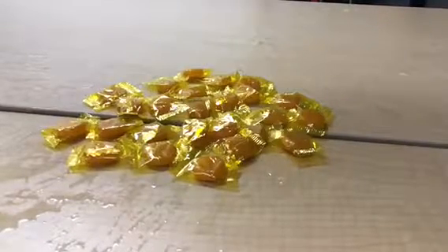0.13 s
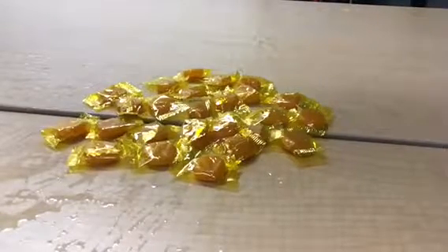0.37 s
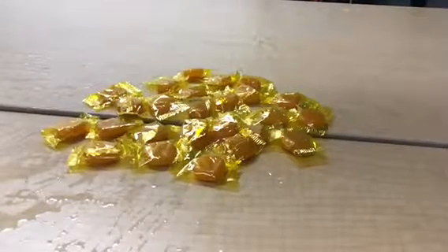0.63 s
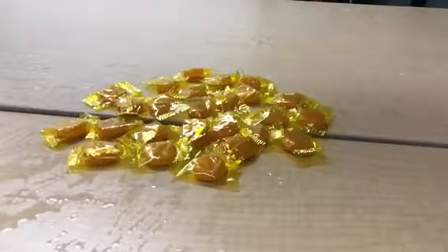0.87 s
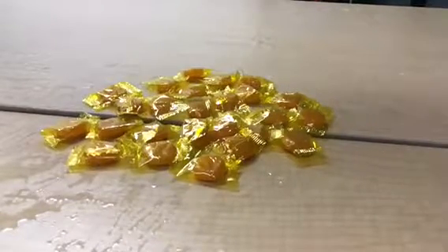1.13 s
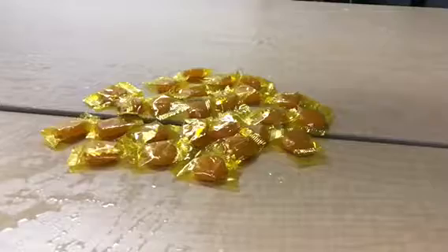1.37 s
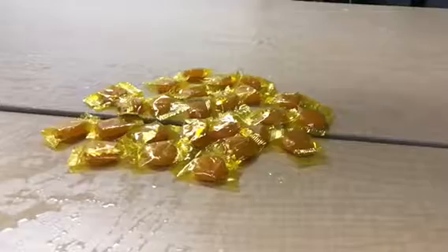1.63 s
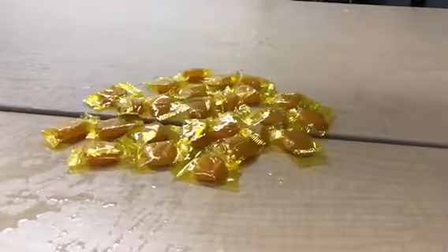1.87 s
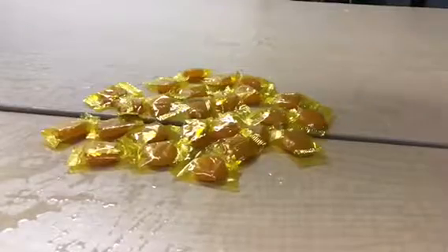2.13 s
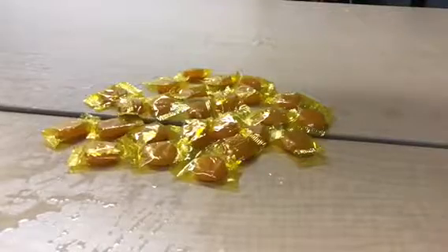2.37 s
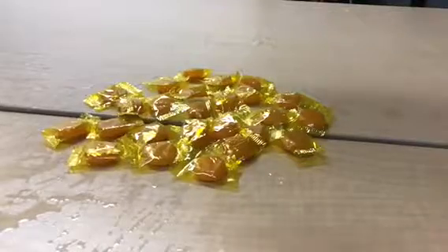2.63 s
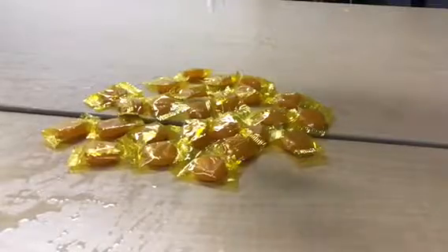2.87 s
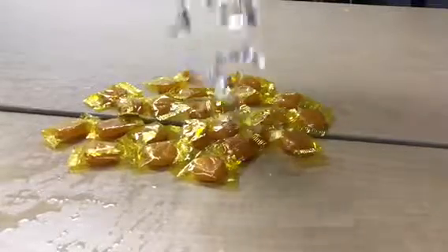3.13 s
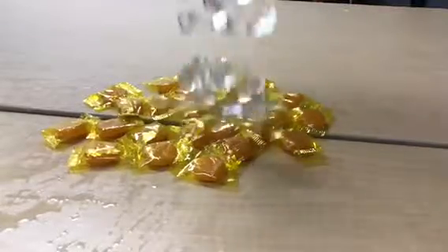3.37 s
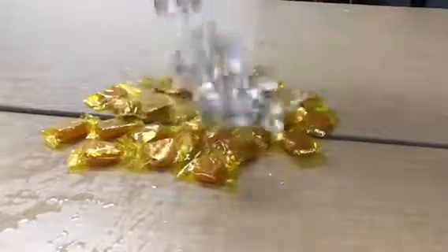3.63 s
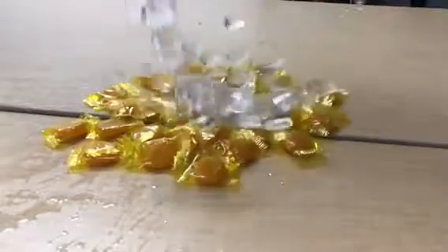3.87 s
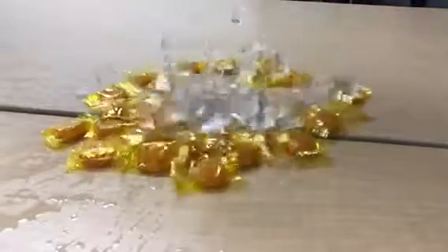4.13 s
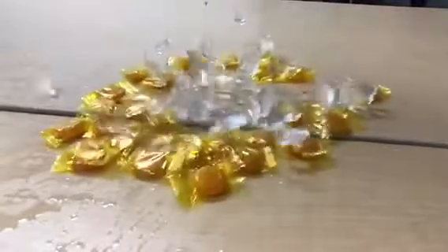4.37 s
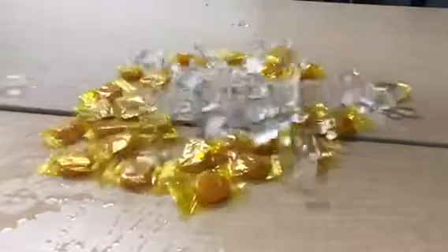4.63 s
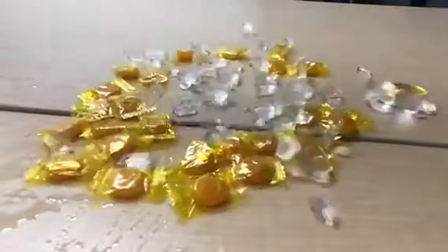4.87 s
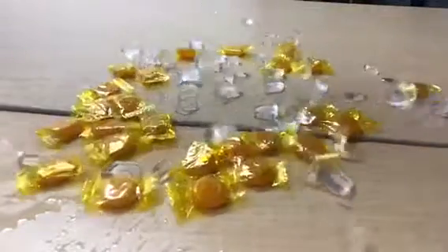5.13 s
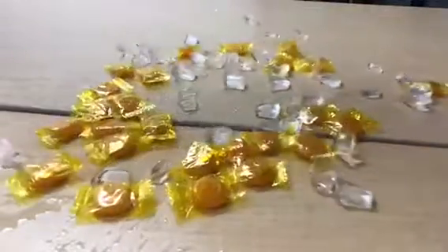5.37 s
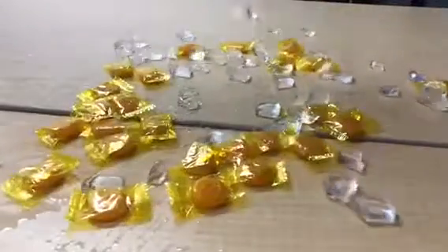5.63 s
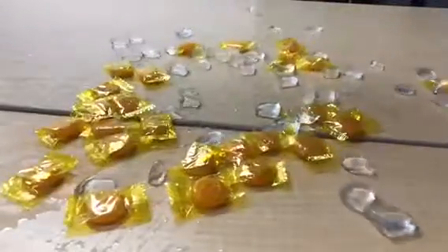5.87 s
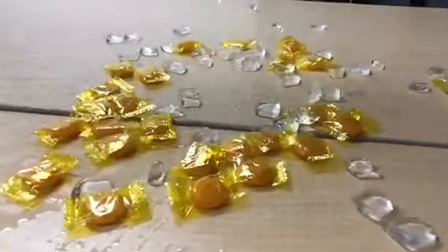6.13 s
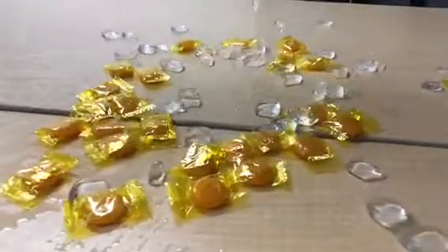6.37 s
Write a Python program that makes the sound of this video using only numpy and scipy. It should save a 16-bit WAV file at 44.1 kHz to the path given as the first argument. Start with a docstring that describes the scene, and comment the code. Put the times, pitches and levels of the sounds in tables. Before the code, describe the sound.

In a quiet room with a faint low hum-like noise, ice cubes slide and bump inside a cup, a hollow, slowed-down rattle. It eases to a few light ticks, then the ice lands on wrapped hard sweets in a sudden loud crackling crash with rumbling table thuds. The clatter comes in waves and thins to single knocks. Close microphone, dull treble, short room reflections.

```python
"""A table in a quiet room: ice cubes slide out of a cup and crash on wrapped sweets, heard in slow motion.
Slowing drops every pitch, so little lies above about 2.3 kHz. Random contacts ring the cup's modes in a hollow
rattle; after a lull while the ice falls, short-lived grains crackle over a rumbling table top.
Single knocks, each a tick and a sagging thud, thin into separate bounces. Reflections and faint noise fill the room."""
import sys
import numpy as np
from scipy import signal
from scipy.fft import rfft, irfft
from scipy.io import wavfile
from scipy.ndimage import uniform_filter1d

SR = 44100
rng = np.random.default_rng(int(sys.argv[2]) if len(sys.argv) > 2 else 0)


def field_ratio(decibels):
    """Amplitude ratio for a level in dB (20 dB per decade); scalars and array-likes work."""
    return 10 ** (np.asarray(decibels, dtype=float) / 20)


def master(y):
    """Save y as 16-bit WAV."""
    cut = np.clip(np.atleast_2d(y).T, -1, 1)
    pcm = np.round(cut * 32767)  # scale
    wavfile.write(sys.argv[1], SR, pcm.astype(np.int16))


N = 286650   # samples, 6.5 s


def rms_one(x):
    """Normalization: divides a signal by its root mean square."""
    return x / np.sqrt(np.mean(x ** 2) + 1e-20)


def in_time(rows):
    """Linear interpolation: joins a table's columns by straight lines, at -150 dB outside it."""
    times_s, *columns = np.transpose(rows)
    t = np.arange(N) / SR
    return [np.interp(t, times_s, column, left=-150, right=-150) for column in columns]


def at_hz(points, hz):
    """Interpolation of a spectrum along a logarithmic frequency axis."""
    point_hz, values = np.array(points).T
    return np.interp(np.log(hz), np.log(point_hz), values)


def drift(rate_hz):
    """Low-passed noise: two equal poles turn white noise into a slow fluctuation of rms 1."""
    step = 40   # samples between computed points
    pole = np.exp(-2 * np.pi * rate_hz * step / SR)
    settling = 2000
    noise = rng.standard_normal(N // step + 2 + settling)
    slow = signal.lfilter([1], [1, -2 * pole, pole ** 2], noise)[settling:]
    return np.interp(np.arange(N) / step, np.arange(len(slow)), rms_one(slow))


def ring(clicks, hz, t60):
    """Damped resonator: a unit click starts a sine of height about 1 that loses 60 dB in t60 seconds."""
    radius = field_ratio(-60 / (max(t60, 0.002) * SR))
    angle = 2 * np.pi * hz / SR
    return signal.lfilter([0, np.sin(angle)], [1, -2 * radius * np.cos(angle), radius ** 2], clicks + 1e-18)


def contacts(per_s, spread_db, clump_db, clump_hz):
    """Random point process: contacts of uneven size and either sign, whose density drifts into clumps."""
    sizes = field_ratio(spread_db * np.minimum(rng.exponential(1, N), 4)) * rng.choice([-1, 1], N)
    chance = per_s * field_ratio(clump_db * drift(clump_hz)) / SR
    return sizes * (rng.random(N) < chance)


def evened(x, seconds):
    """Running normalization: holds the level near rms 1 over the given time, so the finer grain stays."""
    return x / np.sqrt(uniform_filter1d(x ** 2, int(seconds * SR)) + 1e-12)


def grains(clicks, spectrum, cycles, tilt_db=0, count=16):
    """Excitation of small resonators: each contact rings one of several pitches, losing 60 dB in some cycles."""
    pitches = np.geomspace(spectrum[1][0], spectrum[-3][0], count)
    dealt = rng.integers(0, count, N)
    total = np.zeros(N)
    for k, hz in enumerate(pitches):
        tilted = clicks * (dealt == k) * field_ratio(tilt_db * np.log2(hz / 1000))
        total += field_ratio(at_hz(spectrum, hz)) * hz * ring(tilted, hz, cycles / hz)
    return total


def room_tone():
    """Spectral shaping of noise: a faint background, strongest in the bass, whose level wavers slightly."""
    # density of the background noise: pitch_hz, relative level_db (per Hz)
    tone_spectrum = [(12, -24), (20, -5), (29, -0.5), (49, -18), (92, -30.5), (140, -16), (239, -34.5),
                     (1780, -45), (2300, -42), (2990, -75), (5060, -120)]
    hz = np.maximum(np.fft.rfftfreq(N, 1 / SR), 10)
    shaped = irfft(rfft(rng.standard_normal(N)) * field_ratio(at_hz(tone_spectrum, hz)), N)
    return field_ratio(-57.5 + 0.89 * drift(3.9)) * rms_one(shaped)


def room(x):
    """Diffuse reverberation: convolves with noise that sets in after the first wall and dies band by band."""
    # decay of the room: pitch_hz, t60_s
    decay_times = [(60, 0.92), (250, 0.99), (700, 0.7), (1500, 0.37), (2300, 0.35)]
    first_wall_s = 0.017
    t = np.arange(SR) / SR
    edges = 30 * 2.0 ** np.arange(8)   # octave bands, Hz
    tail = np.zeros(SR)
    for low, high in zip(edges, edges[1:]):
        octave = signal.butter(2, [low, high], "band", fs=SR, output="sos")
        band = signal.sosfilt(octave, rng.standard_normal(SR))
        tail += band * field_ratio(-60 * t / at_hz(decay_times, np.sqrt(low * high)))
    tail = tail * np.clip(t / first_wall_s - 1, 0, 1)
    share = (edges[-1] - edges[0]) / (SR / 2)   # part of the spectrum that the tail fills
    return signal.fftconvolve(x, tail * np.sqrt(share / np.sum(tail ** 2)))[:N]


def surges_db():
    """Transient modulation: clumps of cubes that shift at once lift the level fast, then the lift decays."""
    # surges: start_s, strength_db (ahead of the smoothing of the rise)
    clumps = [(0.81, 3.5), (1.255, 2.5), (1.353, 10), (1.559, 7), (1.6, 3), (1.73, 6.5), (1.893, 7.5),
              (2.015, 8), (2.075, 0), (2.221, 10), (2.281, 4), (3.512, 4.5), (3.62, 7), (3.70, 5.5),
              (3.899, 8), (3.92, 5), (3.986, 3), (4.018, 3), (4.06, 2.5), (4.201, 3), (4.4, 5), (4.437, 8),
              (4.625, 4.5), (5.268, 8.5), (5.927, 4.5)]
    rise_s, fade_s = 0.0036, 0.023
    start_s, strength_db = np.transpose(clumps)
    marks = np.zeros(N)
    marks[(start_s * SR).astype(int)] = strength_db
    rise, fade = np.exp(-1 / (rise_s * SR)), np.exp(-1 / (fade_s * SR))
    fading = signal.lfilter([1], [1, -fade], marks + 1e-18)
    return signal.lfilter([1 - rise], [1, -rise], fading)


def cup():
    """Modal excitation: cubes bump the wall, whose modes swell and fade as ice shifts, and scrape each other."""
    # sliding ice, ahead of filter and surges: start_s, hollow_db, scrape_db, lift_db (second mode, relative)
    slide = [(0.0, -97, -102, 6), (0.5, -68, -66.5, 8), (0.76, -53, -63.5, 10.5), (0.83, -43.5, -53, -1),
             (1.08, -41.5, -42, -1), (1.17, -39.5, -49.5, 2), (1.27, -33, -32, -0.5),
             (1.42, -31, -37.5, 10.5), (1.55, -35.5, -38, 4), (1.72, -32, -36.5, 11.5),
             (1.86, -41, -39, -3.5), (1.91, -29.5, -35.5, 0.5), (2.0, -44.5, -39.5, -3.5),
             (2.08, -34.5, -33, -12.5), (2.2, -43.5, -36.5, -7), (2.33, -40, -35.5, -16),
             (2.5, -45, -45, -9), (2.9, -49.5, -50.5, -2.5), (3.25, -57, -59.5, -7.5),
             (3.46, -61, -51, 2.5)]
    # modes of the cup: pitch_hz, width_hz, relative level_db
    cup_modes = [(186, 36, -3.5), (339, 17, 1.5), (484, 33, 3), (1110, 91, -7), (1450, 40, -18)]
    # density of the scraping: pitch_hz, relative level_db (per Hz)
    scrape_spectrum = [(290, -30), (500, -10.5), (568, 0.5), (1020, -6), (1100, -6), (1910, -15),
                       (2300, -14.5), (2990, -39.5), (5060, -120)]
    hollow_db, scrape_db, lift_db = in_time(slide)
    bumps = contacts(500, spread_db=0.5, clump_db=3.0, clump_hz=13)
    modes = []
    for hz, width_hz, level_db in cup_modes:
        strengths = rng.normal(0, 1, N)
        swelling = field_ratio(level_db + 2.5 * drift(3.2))
        modes.append(swelling * np.sqrt(width_hz) * ring(bumps * strengths, hz, 2.4 / width_hz))
    modes[1] = modes[1] * field_ratio(np.clip(lift_db, -15, 15))
    scrape_contacts = contacts(1800, spread_db=2.0, clump_db=5.0, clump_hz=14)
    scrape = grains(scrape_contacts, scrape_spectrum, cycles=17.0)
    rattle = field_ratio(hollow_db) * evened(sum(modes), 0.18) + field_ratio(scrape_db) * evened(scrape, 0.13)
    small_body = signal.butter(3, 78, "high", fs=SR, output="sos")   # Hz; too small to radiate bass
    return signal.sosfilt(small_body, rattle)


def table(blows):
    """Modal superposition: every blow strikes each mode of the table top with a strength of its own."""
    # modes of the table top: pitch_hz, relative level_db, t60_s
    table_modes = [(45, -24.5, 0.13), (74, -11.5, 0.097), (118, -5.5, 0.069), (170.2, -3.5, .1),
                   (206, 3, 0.046), (271, 0.5, 0.042), (330, 4, 0.02), (422.3, 1.5, 0.067), (506, 3, 0.035)]
    total = np.zeros(N)
    for hz, level_db, t60_s in table_modes:
        strengths = 1 + 0.5 * rng.standard_normal(N)
        total += field_ratio(level_db) * ring(blows * strengths, hz, t60_s)
    return total


def heap():
    """Sum of countless small impacts: wrappers and ice crackle, and the table's modes rumble under them."""
    # heap landing in waves, then scattering: start_s, crackle_db (ahead of surges), rumble_db
    waves = [(3.47, -53.5, -47), (3.484, -12, -38), (3.505, -21, -32), (3.55, -14, -29),
             (3.58, -21.5, -23.5), (3.65, -17.5, -24), (3.70, -14.5, -23.5), (3.778, -11.5, -22),
             (3.812, -43, -34), (3.85, -30, -34), (3.88, -19, -28.5), (4.05, -16, -30),
             (4.08, -20.5, -26.5), (4.138, -24.5, -24.5), (4.17, -18, -19.5), (4.25, -13.5, -23),
             (4.38, -22.5, -21.5), (4.45, -24.5, -25), (4.5, -9.5, -19.5), (4.55, -23.5, -15.5),
             (4.6, -25.5, -32), (4.634, -21.5, -22.5), (4.7, -27, -26.5), (4.84, -29, -29),
             (4.87, -27, -21), (5.05, -33, -33), (5.12, -27, -31), (5.34, -29, -29), (5.5, -30, -31.5),
             (5.69, -36.5, -37.5), (5.73, -37.5, -35.5), (5.88, -37.5, -37), (5.948, -27, -39),
             (5.99, -32, -29.5), (6.07, -40.5, -39.5), (6.5, -42, -38.5)]
    # density of the crackle ahead of the tilt: pitch_hz, relative level_db (per Hz)
    crackle_spectrum = [(210, -32), (350, -12), (499, -0.5), (800, -10), (852, -8.5), (1050, 1),
                        (1360, -9.5), (1980, -7.5), (2300, -5), (2990, -17), (5060, -120)]
    even_colour_db, brightening = -25.5, 0.15   # crackle level without tilt; dB per octave for each dB of level
    crackle_db, rumble_db = in_time(waves)
    touches = contacts(2200, spread_db=3.0, clump_db=2.5, clump_hz=30)
    tilt_db = brightening * np.clip(crackle_db - even_colour_db, -20, 20)   # per octave: louder is brighter
    crackle = grains(touches, crackle_spectrum, cycles=8.6, tilt_db=tilt_db)
    rumble = table(contacts(400, spread_db=2.0, clump_db=2.5, clump_hz=12.0))
    return field_ratio(crackle_db + surges_db()) * evened(crackle, 0.082) + field_ratio(rumble_db) * evened(rumble, 0.12)


def knocks():
    """Impact sound: a tick of three partials and a low thud; once the ice has landed the table rings on."""
    # single knocks of a cube: start_s, tick peak_db, tick pitch_hz, thud level_db (ahead of its envelope),
    # thud pitch_hz (near onset)
    cube_knocks = [(0.556, -57, 820, -33.5, 304), (0.771, -64.5, 619, -27, 171.6),
                   (0.819, -40, 622, -43, 454), (0.927, -38.5, 620, -32, 447),
                   (1.265, -26, 645, -39.5, 494), (1.291, -20.5, 1040, -33, 497),
                   (1.357, -22.5, 840, -33, 333), (1.569, -28, 651, -33, 339),
                   (1.733, -17.5, 1970, -16, 334), (1.791, -33.5, 1100, -19.5, 330),
                   (1.9, -30, 729, -12.5, 462), (2.018, -24.5, 1110, -27, 350), (2.049, -26, 653, -19, 500),
                   (2.228, -26, 807, -19, 513), (2.282, -22.5, 1560, -34.5, 528),
                   (2.616, -30, 630, -33, 525), (2.723, -25, 905, -42, 545), (2.883, -33, 2260, -44.5, 455),
                   (2.955, -31, 666, -39.5, 449), (3.073, -36.5, 2230, -52, 436),
                   (3.108, -28, 1230, -56.5, 439), (3.141, -37.5, 975, -46, 415),
                   (3.167, -57, 646, -33, 276), (3.229, -39, 864, -51, 487), (3.383, -38, 2160, -46.5, 563),
                   (3.413, -31.5, 2300, -59, 450), (3.483, -4.5, 1190, -10.5, 565),
                   (3.513, -5, 2100, -13, 593), (3.532, -10, 1650, -9.5, 390.5), (3.54, -3, 1950, -8, 498),
                   (3.549, -1, 1010, -9.5, 320), (3.624, -5.5, 1050, -7.5, 359.5),
                   (3.637, -5.5, 1030, -9, 460), (3.711, -6, 1640, -14, 234), (3.76, 0.5, 585, -13.5, 568),
                   (3.768, -3.5, 1940, -6, 514), (3.784, 4, 1503, -19.5, 406),
                   (3.853, -8.5, 2316, -27, 482), (3.902, -4.5, 1715, -12, 501),
                   (3.989, -6.5, 920, -15, 222), (4.025, -7, 1086, -18, 219),
                   (4.062, -6.5, 2310, -23.5, 403), (4.205, -2, 2400, -4, 560),
                   (4.255, -1.5, 1680, -8, 495), (4.317, -12, 1740, -17, 487), (4.339, -7, 2080, -14, 172),
                   (4.402, -2.5, 1090, -18, 503), (4.438, -13, 2260, -11.5, 493),
                   (4.459, -12, 2150, -4, 406), (4.488, -8, 2240, -13.5, 495),
                   (4.509, -12, 1030, -12.5, 293), (4.628, -4, 656, -15.5, 589), (4.739, -9, 635, -18, 417),
                   (4.781, -7, 701, -16, 183), (4.8, -10, 1000, -24, 199.8),
                   (4.812, -6.5, 1136, -20.5, 151.6), (4.859, -8, 1700, 1.5, 394),
                   (4.904, -19.5, 610, -9.5, 202), (4.935, -10.5, 1900, -3, 382),
                   (4.992, -6.5, 715, -16.5, 196), (5.032, -15.5, 1018, -26, 231),
                   (5.056, -11, 890, -19.5, 153.7), (5.121, -12.5, 724, -11, 315),
                   (5.138, -12, 1227, -23.5, 342), (5.16, -6, 1647, -18.5, 151),
                   (5.184, -13, 1502, -17, 212), (5.199, -1.5, 1400, -34, 598), (5.27, -11, 2005, -22, 269),
                   (5.3, -9, 1196, -25.5, 151), (5.357, -7, 837, -18, 510), (5.5, -11.5, 898, -28.5, 159),
                   (5.512, -9.5, 617, -21.5, 595), (5.623, -9, 2260, -17.5, 583),
                   (5.68, -17.5, 702, -16.5, 357), (5.783, -11, 1194, -21.5, 206),
                   (5.823, -4.5, 1455, -21.5, 194), (5.896, -9, 1127, -13.5, 400),
                   (5.917, -22, 627, -16.5, 600), (5.929, -14.5, 2370, -23, 509),
                   (5.964, -14, 1270, -18.5, 463), (5.996, -14.5, 712, -23.5, 484),
                   (6.034, -26.5, 800, -20.5, 400), (6.124, -24.5, 1020, -30, 213),
                   (6.27, -19.5, 700, -23, 230), (6.317, -23, 723, -52, 151),
                   (6.426, -25.5, 1360, -31, 186)]
    tick_attack_s, tick_t60_s = 0.0003, 0.011
    thud_attack_s, thud_cycles = 0.0015, 12.3   # cycles of the onset pitch in a 60 dB decay
    landing_s, table_share_db = 3.45, -17
    out, blows = np.zeros(N), np.zeros(N)
    t = np.arange(int(0.1 * SR)) / SR
    chance = rng.random((len(cube_knocks), 3))
    tick_envelope = (1 - np.exp(-t / tick_attack_s)) * field_ratio(-60 * t / tick_t60_s)
    # warped time: the thud drops in pitch as the contact spreads
    sag = t - 0.19 * (t - 0.0071 * (1 - np.exp(-t / 0.0067)))
    for (start_s, tick_db, tick_hz, thud_db, thud_hz), (low, high, side) in zip(cube_knocks, chance):
        at = round(start_s * SR)
        sign = np.sign(side - 0.5)
        partials = tick_hz * np.array([[1], [0.68 + 0.19 * low], [1.2 + 0.59 * high]])
        tick = field_ratio([0, -6.0, -7.0]) @ np.sin(2 * np.pi * partials * t) * tick_envelope
        tick = field_ratio(tick_db) * tick / np.abs(tick).max()
        thud_envelope = (1 - np.exp(-t / thud_attack_s)) * field_ratio(-60 * t * thud_hz / thud_cycles)
        thud = field_ratio(thud_db) * np.sin(2 * np.pi * thud_hz * sag) * thud_envelope
        out[at:at + len(t)] += sign * (tick + thud)[:N - at]
        blows[at] = sign * field_ratio(thud_db + table_share_db) * (start_s > landing_s)
    return out + table(blows)


def scene():
    """Superposition of the direct ice sounds, their reflections and the room's own noise."""
    ice = field_ratio(surges_db()) * cup() + heap() + knocks()
    reflections = field_ratio(-10.5) * room(ice)
    return (ice + reflections + room_tone())[None]


def roll_off(x):
    """The treble ends steeply here."""
    return signal.sosfilt(signal.butter(12, 3200, fs=SR, output="sos"), x)


def record(dry):
    """Saturation and band limiting: the microphone rounds peaks; a resonance sits under a steep top edge."""
    edge_hz = 2335   # top of the slowed band; the steep edge makes the highest tones lag
    peak_hz, peak_width_hz, peak_db = 2290, 60, 8
    size = dry.shape[-1]
    hz = np.fft.rfftfreq(size, 1 / SR)
    resonance = 1 + (field_ratio(peak_db) - 1) / (1 + 2j * (hz - peak_hz) / peak_width_hz)
    edge = signal.ellip(12, 0.5, 85, edge_hz, fs=SR, output="sos")
    rounded = 1.05 * np.tanh(dry / 1.1)
    resonant = irfft(rfft(rounded) * resonance, size)
    mix = signal.sosfilt(edge, resonant)
    return roll_off(mix)


dry = scene()
out = record(dry)
master(out)
```